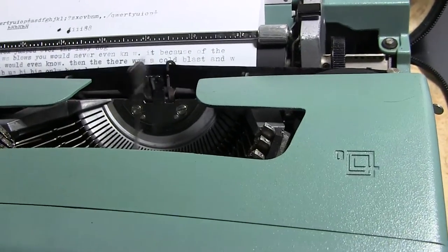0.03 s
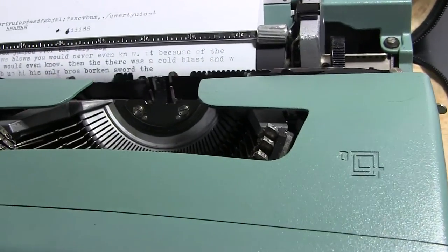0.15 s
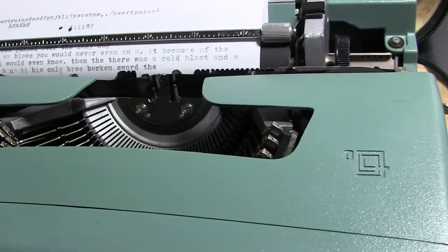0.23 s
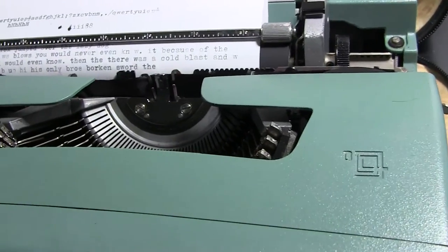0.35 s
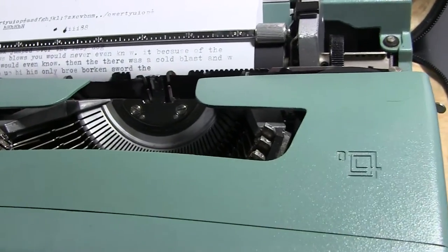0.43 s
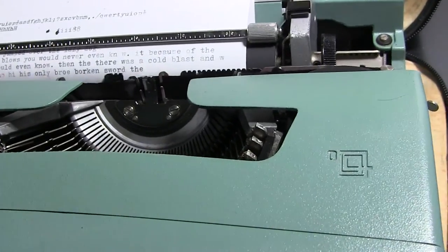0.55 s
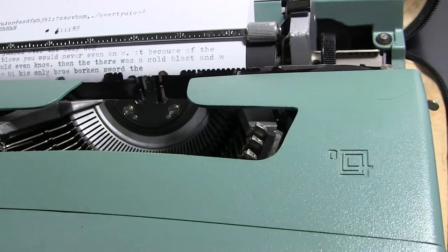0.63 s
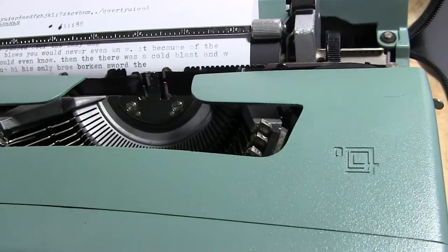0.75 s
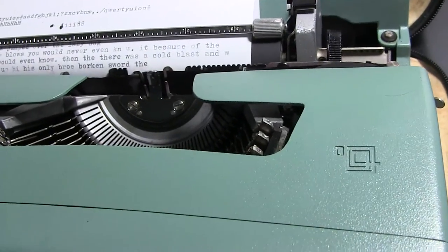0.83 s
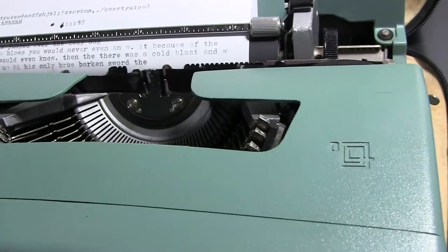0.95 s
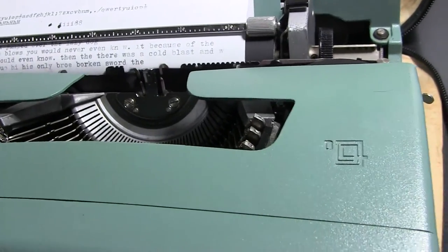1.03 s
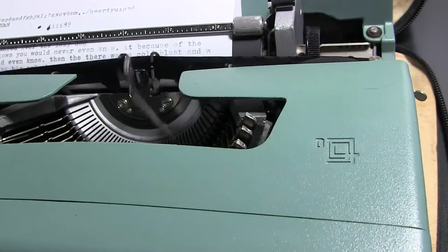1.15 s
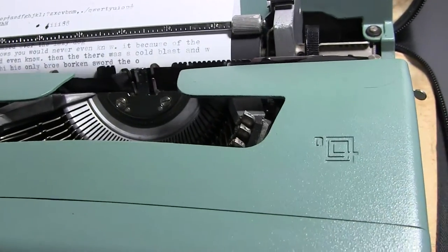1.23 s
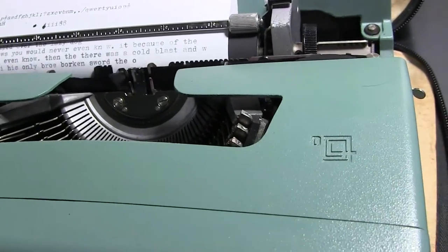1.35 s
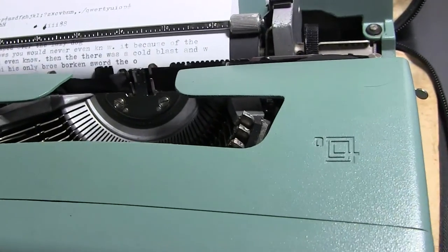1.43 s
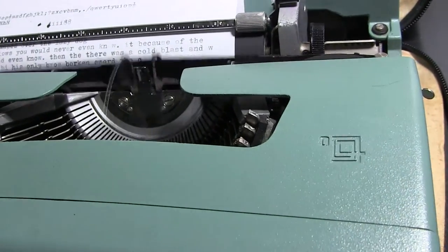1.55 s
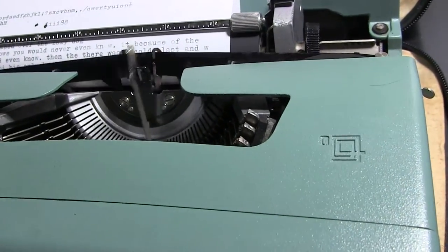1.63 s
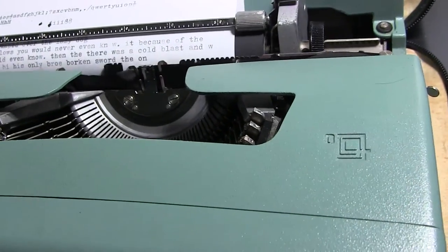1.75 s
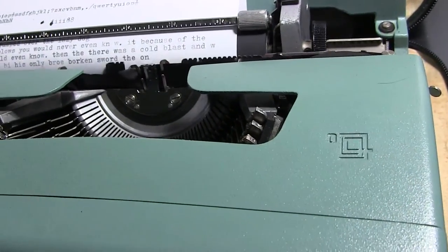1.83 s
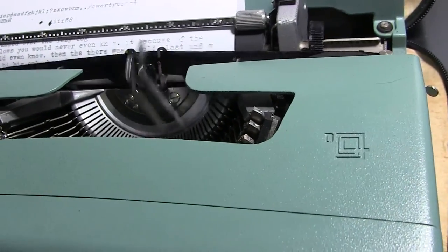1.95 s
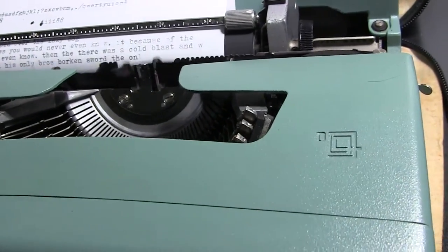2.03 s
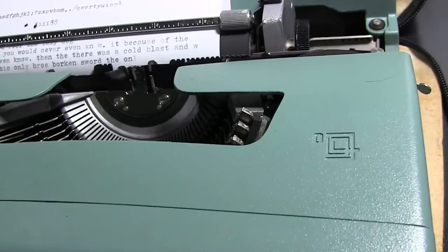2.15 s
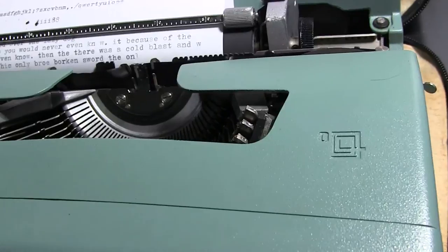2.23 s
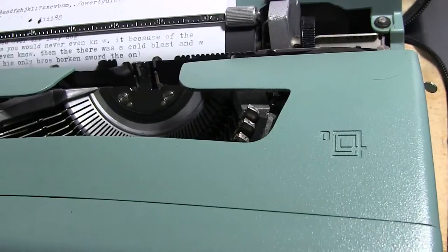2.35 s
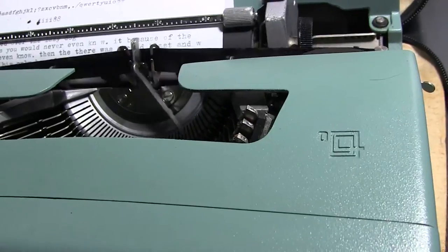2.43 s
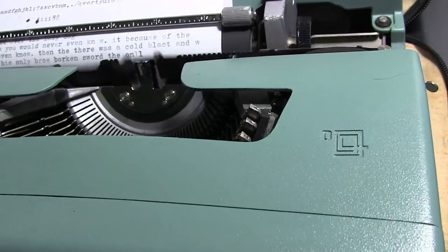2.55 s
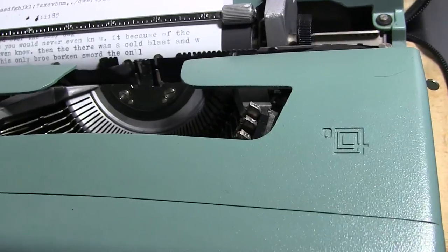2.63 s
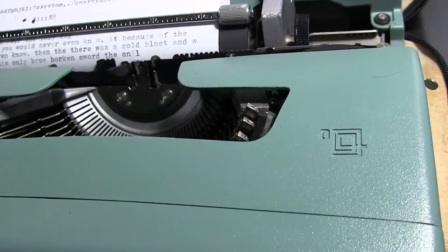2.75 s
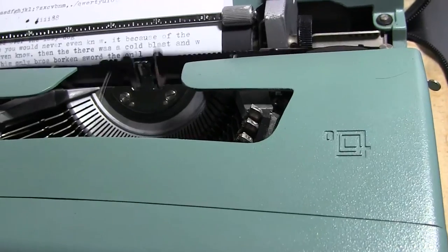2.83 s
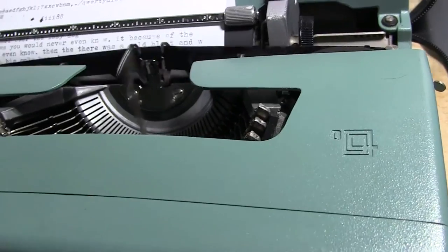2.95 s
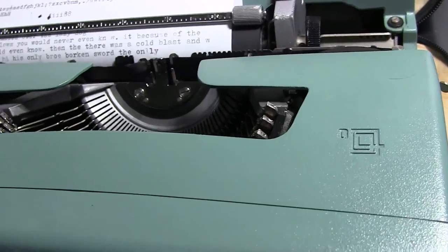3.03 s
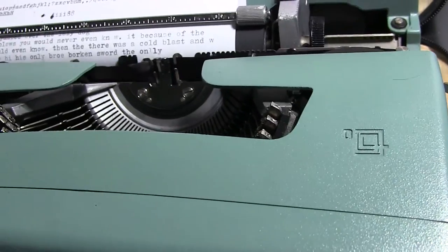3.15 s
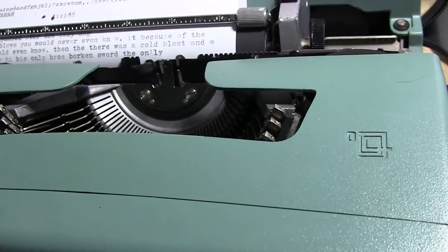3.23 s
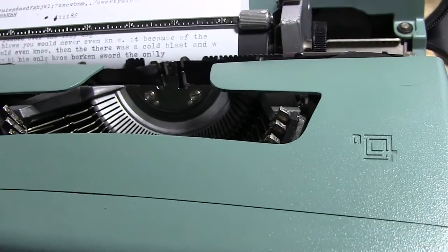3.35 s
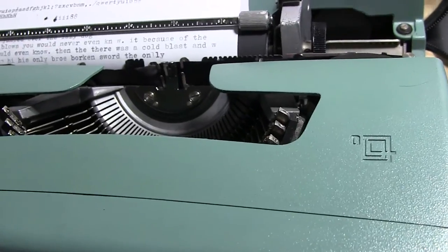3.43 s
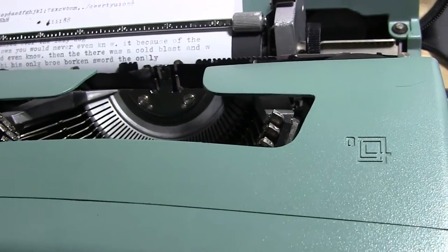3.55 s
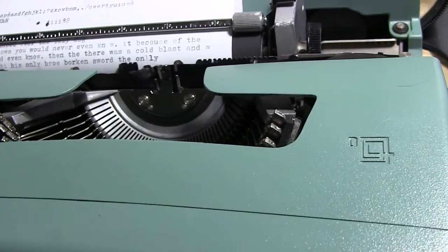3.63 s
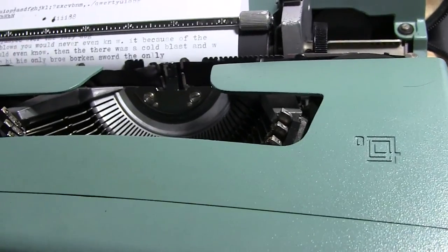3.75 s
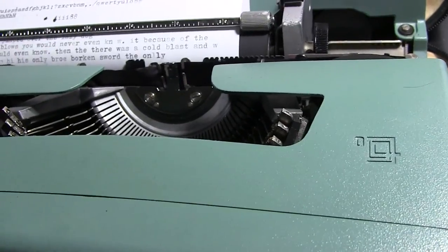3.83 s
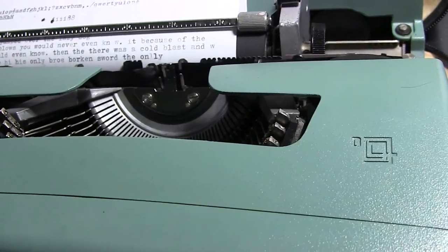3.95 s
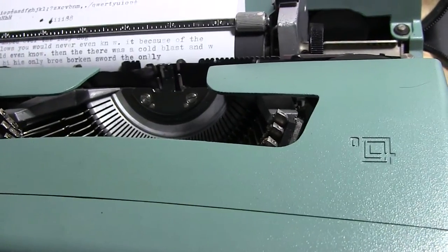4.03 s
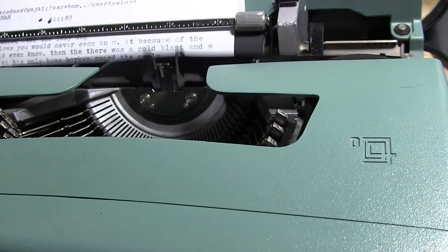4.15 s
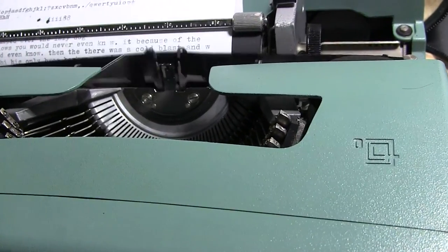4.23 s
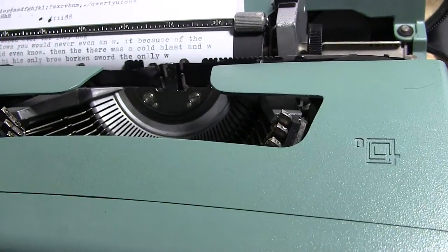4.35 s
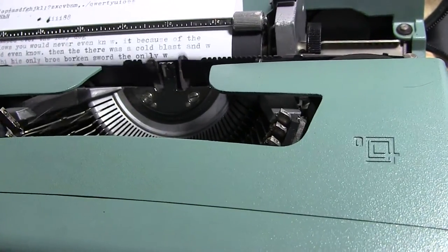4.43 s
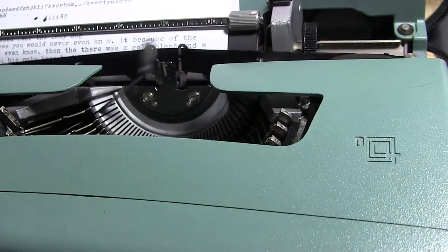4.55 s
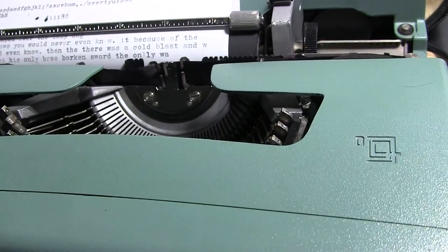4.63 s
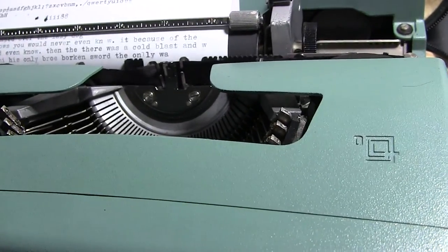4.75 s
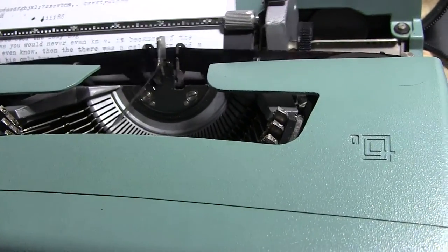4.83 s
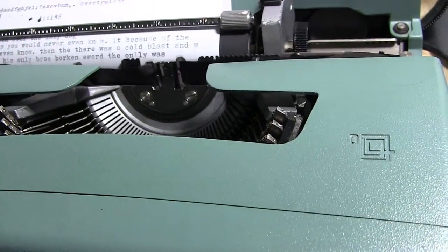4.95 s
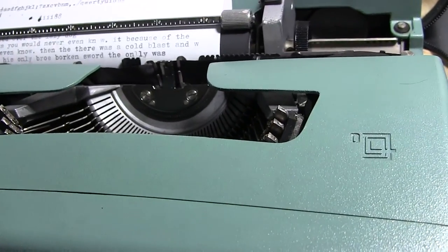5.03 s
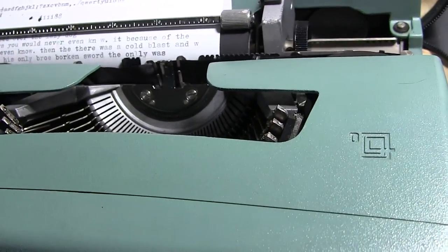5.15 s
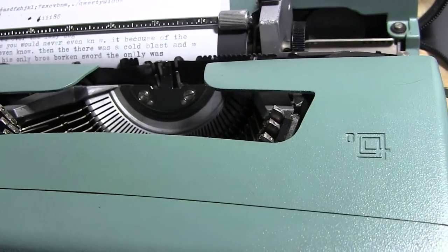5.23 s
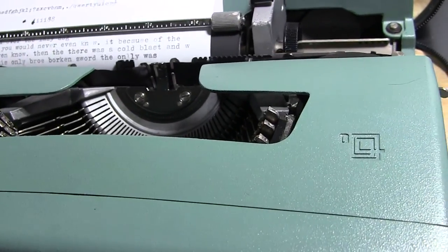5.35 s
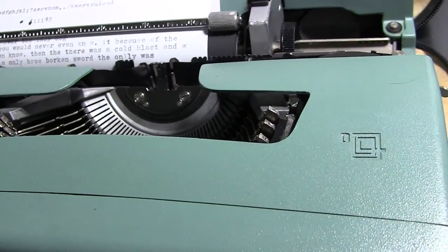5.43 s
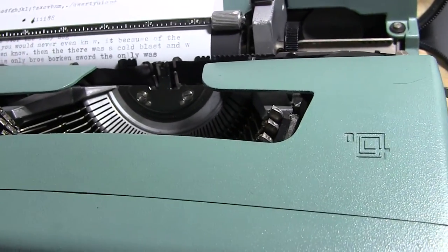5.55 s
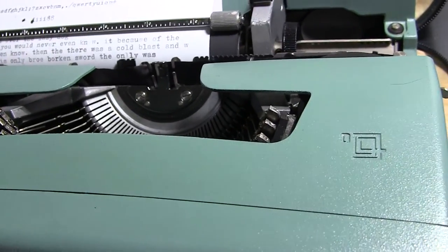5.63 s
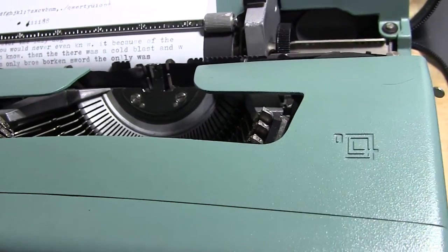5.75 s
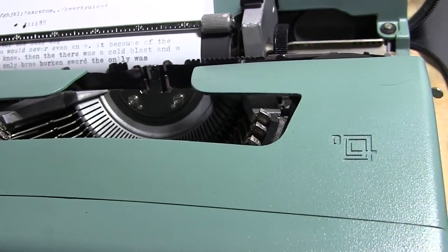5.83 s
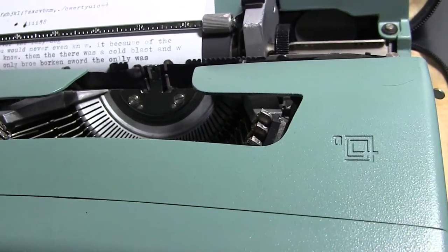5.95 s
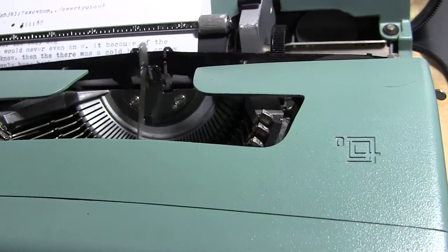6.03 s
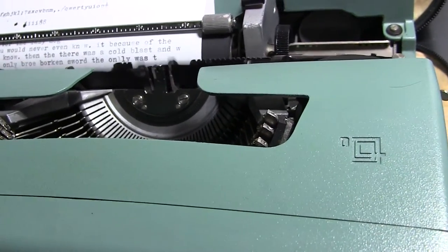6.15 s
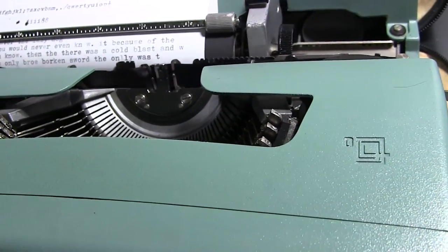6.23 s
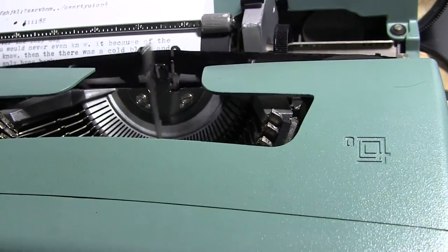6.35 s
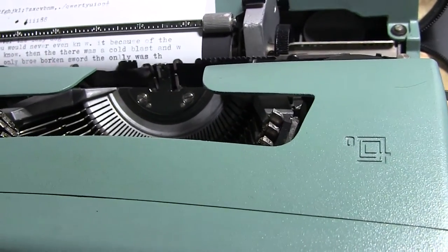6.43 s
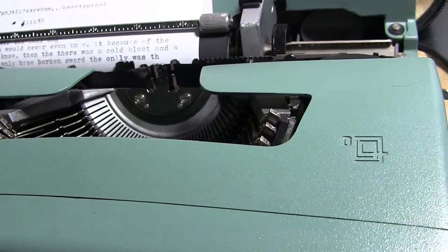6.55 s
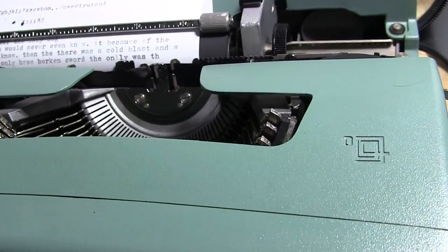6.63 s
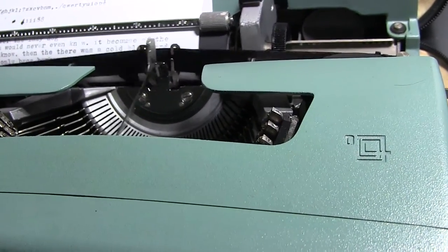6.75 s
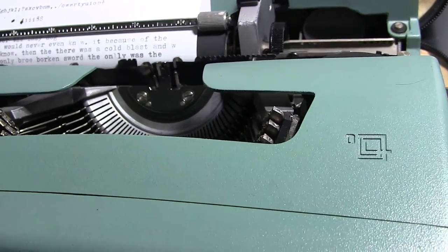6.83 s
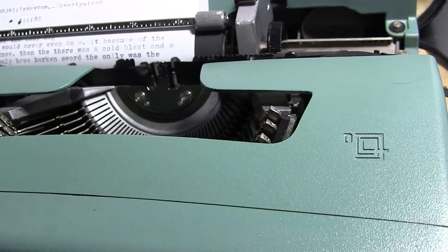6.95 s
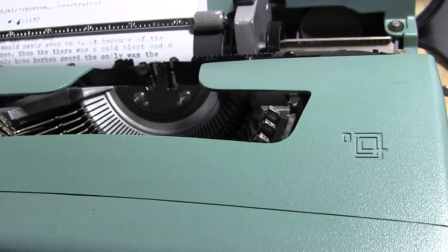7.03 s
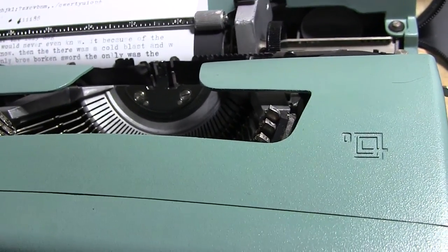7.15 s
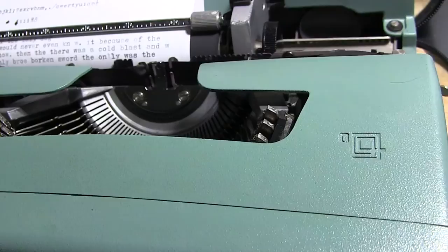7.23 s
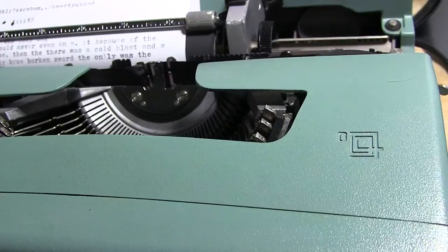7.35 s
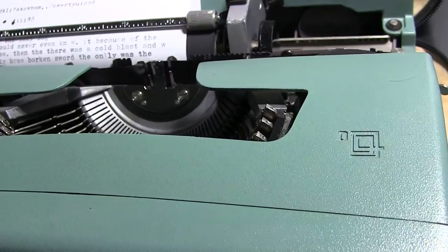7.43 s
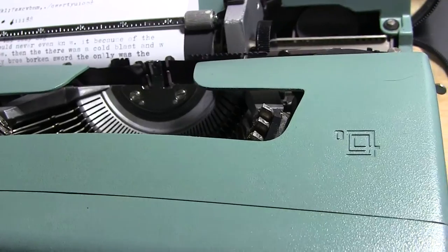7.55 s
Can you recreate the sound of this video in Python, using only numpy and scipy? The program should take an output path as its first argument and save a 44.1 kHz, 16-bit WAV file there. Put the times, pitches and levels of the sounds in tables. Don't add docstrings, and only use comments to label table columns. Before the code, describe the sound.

Close stereo pickup of a manual typewriter on a desk in a quiet room. A space bar slap comes first, then single letters crack sharply about half a second apart, each followed by carriage click and clack of the bar falling back. Heavier space bar thunks separate three short words, with pauses between, and the metal cover rings faintly.

```python
import sys
import numpy as np
from scipy import signal
from scipy.fft import rfft, irfft, next_fast_len
from scipy.io import wavfile
from scipy.ndimage import uniform_filter1d

SR = 44100
rng = np.random.default_rng(int(sys.argv[2]) if len(sys.argv) > 2 else 0)


def materialize(psi):
    bounded = np.clip(np.atleast_2d(psi).T, -1, 1)
    quanta = np.round(bounded * 32767).astype(np.int16)
    wavfile.write(sys.argv[1], SR, quanta)


def how_loud(loudness_db):
    steps = np.asarray(loudness_db, float) / 20
    return 10 ** steps


N = 335160


def unit(x):
    return x / np.sqrt(np.mean(x ** 2) + 1e-20)


def along(points, hz):
    f, v = np.transpose(points)
    return np.interp(np.log(hz + 1), np.log(f + 1), v)


def filtered(x, response):
    m = next_fast_len(x.shape[-1] + SR // 4)
    spectrum = rfft(x, m) * response(np.fft.rfftfreq(m, 1 / SR))
    return irfft(spectrum, m)[..., :x.shape[-1]]


def resonances(modes):
    def response(f):
        total = 0
        for k, (centre, width, db) in enumerate(modes):
            damping = 1j * f * width
            total = total + (-1) ** k * how_loud(db) * damping / (centre ** 2 - f ** 2 + damping)
        return total
    return response


def add(track, s, sound):
    part = track[max(round(s * SR), 0):][:len(sound)]
    part += sound[:len(part)]


def fall(t60, rise_s, count):
    t = np.arange(count) / SR
    return how_loud(-60 * t / t60) * (1 - np.exp(-t / rise_s))


def click(spectrum, hz, t60, lift_db, width, rise_s, dull_db=0):
    def colour(f):
        hump_db = lift_db * np.exp(-(np.log((f + 1) / hz) / width) ** 2)
        return how_loud(along(spectrum, f) + hump_db - dull_db * f / (f + 3000))

    noise = filtered(rng.standard_normal(3000), colour)
    burst = noise * fall(t60, rise_s, count=3000)
    return burst / np.abs(burst).max()


def ring(modes, scatter_db, count):
    t = np.arange(count) / SR
    draw = rng.standard_normal((len(modes), 2))
    total = np.zeros(count)
    for (hz, db, t60), (strength, phase) in zip(modes, draw):
        decay = how_loud(db + scatter_db * strength - 60 * t / t60)
        total += decay * np.sin(2 * np.pi * hz * t + 2 * phase)
    return total


def knocks(track, s, db, t60, hz):
    pushes = rng.standard_normal(1500) * fall(t60, rise_s=0.0029, count=1500)
    at_modes = np.exp(-2j * np.pi * np.outer(hz, np.arange(1500)) / SR) @ pushes
    add(track, s, how_loud(db) * pushes * 10 / np.sqrt(np.mean(np.abs(at_modes) ** 2)))


# (frequency [Hz], density [dB per Hz])
RATTLE = [(290, -20.5), (500, 6.5), (1870, 2.5), (2610, 4), (8330, -6), (12300, -14.5), (15300, -34),
          (16000, -55.5)]


def linkage(level):
    z = signal.stft(rng.standard_normal(N + 256), nperseg=256)[2]
    tinkles = uniform_filter1d(rng.standard_normal(z.shape), size=4, axis=1)
    noise = signal.istft(z * how_loud(3.6 * unit(tinkles)), nperseg=256)[1][:N]
    grain = how_loud(1.5 * unit(uniform_filter1d(rng.standard_normal(N), size=90)))
    coloured = filtered(noise, lambda f: how_loud(along(RATTLE, f)) / (1 + (f / 14300) ** 30))
    return level * unit(grain * coloured)


# (time [s], peak [dB], colour [Hz], rattle [dB], run-up [s])
STRIKES = [(1.2255, -3.5, 3180, -25.5, .0095), (1.731, -1.5, 3100, -28, .011),
           (2.0634, -9.5, 2710, -26, .009), (2.5647, -3.5, 3000, -23.5, .007),
           (3.0021, -4, 2580, -26, .009), (4.2942, -2.5, 6100, -25.5, .014),
           (4.6097, -3.5, 2650, -26, .008), (4.9557, -2.5, 2560, -21, .009), (6.1321, -3, 4050, -22, .007),
           (6.4303, -2, 2580, -25.5, .009), (6.858, -3.5, 4120, -22, .0045)]
# (frequency [Hz], density [dB per Hz])
CRACK = [(350, -52.5), (600, -15), (1750, -12), (2610, -0.5), (4840, -2), (6640, -6), (11500, -12),
         (16000, -32)]
# (frequency [Hz], level [dB], t60 [s])
BAR = [(4400, -4, .25), (7300, -8.5, .08), (7650, -1.5, .08), (10590, -7, .2), (11945, 3.5, 0.12)]
BAR_RING = [-48, -48, -48, -40, -44, -19, -20, -25, -38, -42, -44]
RUN_DB = -25.5


def typebars():
    out, chatter = np.zeros(N), np.zeros(N)
    for (s, db, hz, rattle_db, run_s), ring_db in zip(STRIKES, BAR_RING):
        crack = click(CRACK, hz, t60=0.027, lift_db=8, width=0.067, rise_s=0.00085)
        add(out, s, how_loud(db + 1) * crack)
        snap = click(CRACK, 10000, t60=.009, lift_db=2, width=0.7, rise_s=0.000069)
        add(out, s, how_loud(db + 7.5) * snap)
        add(out, s, how_loud(db + ring_db) * ring(BAR, scatter_db=0, count=8000))
        # (Hz, t60 s)
        drawn = rng.uniform([3000, .1], [11000, .3], size=(16, 2))
        rods = [(rod_hz, along(RATTLE, rod_hz), t60) for rod_hz, t60 in drawn]
        add(out, s, how_loud(db + rattle_db - 11.5) * ring(rods, scatter_db=4, count=9000))
        add(chatter, s, how_loud(db + rattle_db) * fall(0.48, rise_s=.004, count=16000))
        add(chatter, s - run_s, how_loud(RUN_DB + np.linspace(-6, 3, round(run_s * SR))))
    return out + linkage(chatter)


# (time [s], click [dB], colour [Hz], weight [dB])
PRESSES = [(.0667, -20.5, 1160, -31), (.0912, -22.5, 1040, -34), (1.1568, -34.5, 1510, -41),
           (1.1897, -34.5, 1070, -40), (1.6806, -23.5, 1380, -28), (1.9869, -23, 1700, -29),
           (2.0363, -27, 2700, -27), (2.5282, -11.5, 1580, -24), (2.9567, -17, 1130, -21.5),
           (4.2504, -36.5, 1070, -34), (4.564, -23, 1330, -29), (4.5744, -25, 1044, -30),
           (4.9162, -19.5, 3500, -25), (6.0741, -36, 1070, -34.5), (6.3864, -15, 1325, -22.5),
           (6.8099, -19.5, 3350, -26)]
# (time [s], click [dB], colour [Hz], weight [dB])
TRIPS = [(1.2635, -18, 3930, -35), (1.7674, -16, 3730, -28), (2.0916, -13, 5560, -29),
         (2.6194, -19, 3180, -28), (4.3344, -17, 1120, -27), (4.371, -10.5, 3820, -29),
         (4.3804, -15.5, 1380, -34), (4.6394, -13, 3700, -23), (4.6994, -22, 1030, -33),
         (4.9994, -16.5, 4400, -30)]
# (time [s], click [dB], weight [dB], rattle [dB])
STEPS = [(.1401, -8, -22, -23.5), (1.2745, -10.5, -21.5, -21.5), (1.7844, -14, -22, -25.5),
         (2.1121, -8, -19, -25), (2.6524, -11, -21, -22), (3.0515, -16.5, -21, -19),
         (3.3588, -16, -22, -25), (4.3869, -14.5, -22, -28.5), (4.6624, -11.5, -20, -26),
         (5.0549, -10.5, -22, -27), (5.4316, -11.5, -24, -26), (6.1823, -12.5, -22, -19.5),
         (6.4817, -12.5, -21, -21), (6.9102, -12.5, -23, -24.5), (7.3407, -14.5, -23.5, -25)]
STEP_HZ = 1090
# (time [s], click [dB], colour [Hz], weight [dB], ring left in cover [dB])
RESTS = [(.2324, -3, 1070, -19, 2), (1.3653, -5.5, 2216, -23.5, 0), (1.8567, -2, 1030, -20, 2),
         (2.1809, -3.5, 2460, -22, -2), (2.6893, -4.5, 990, -24, 4), (3.1298, -3, 2240, -23, 1),
         (4.4114, -5, 1430, -21.5, 3), (4.7451, -5, 1580, -20.5, -5), (5.0809, -8, 1840, -21, 1),
         (6.2871, -2, 1650, -21, 0), (6.5495, -3, 2200, -20, -1), (6.9805, -3.5, 1570, -21, 0)]
# (time [s], click [dB], colour [Hz], weight [dB], hum [dB])
SPACES = [
    (.1156, -5, 1360, -13, -20),
    (3.3293, 0, 1330, -14, -13.5),
    (5.4026, 0.5, 1876, -15.5, -14),
    (7.3103, -.5, 1370, -16, -14),
]
# (time [s], click [dB], colour [Hz], weight [dB])
SPRINGS = [
    (.2144, -18, 4500, -30),
    (3.4544, -18.5, 1330, -31),
    (3.4695, -9, 4740, -27),
    (5.5263, -13, 5170, -24),
    (7.4354, -29, 5130, -40),
    (7.448, -18.5, 4830, -35),
]
# (time [s], click [dB], colour [Hz], weight [dB])
LANDS = [
    (3.4844, -11.5, 1110, -23),
    (5.5494, -12, 1170, -20),
    (7.4649, -13, 1110, -21.5),
]
# (click t60 [s], rattle [dB], knock [dB], thud [dB], thud lag [s],
# desk [dB], push t60 [s], resonance [dB])
PRESS = (.03, -7.5, -4, 0, .001, -14, .027, 5)
TRIP = (.033, -1, 4, -4, 0, -11, .03, 7)
STEP = (.027, 0, 8, 0, .003, -9, .028, 4.5)
REST = (.023, -9, 3, 0, -.004, -17, .03, 8)
STOP = (.021, -19, -2, -5, .002, -18, .04, 6)
SPRING = (.045, -2, -8, -2, -.003, -7, .03, 14)
LAND = (.035, -20, 8, 0, -.003, -8, .035, 4.5)


def metal_contacts():
    contact_list = []
    for s, db, weight_db, rattle_db in STEPS:
        contact_list.append((s, db, STEP_HZ, weight_db, rattle_db - weight_db, STEP))
    tables = [(PRESSES, PRESS), (TRIPS, TRIP), (RESTS, REST),
              (SPACES, STOP), (SPRINGS, SPRING), (LANDS, LAND)]
    for rows, part in tables:
        contact_list += [(*row[:4], 0, part) for row in rows]
    return contact_list


# (time [s], peak [dB], colour [Hz])
TICKS = [(.222, -24, 1480), (1.209, -26.5, 2000), (1.353, -26, 2500), (1.714, -29, 2500),
         (2.092, -11, 10920), (3.5044, -22, 4700), (4.6, -27.5, 2930), (4.735, -36.5, 4010),
         (5.517, -22.5, 5000), (5.533, -16, 4870), (6.118, -21.5, 6000), (6.142, -18.5, 8000),
         (7.373, -32.5, 4470), (7.4894, -38.5, 1180)]
TICK_T60_S = .042
# (lag [s], level under the stop [dB], colour [Hz])
SPACE_LEADS = [
    (-.018, -28, 4500),
    (-.008, -19, 3800),
]
# (time [s], peak [dB])
BOUNCES = [(1.423, -27), (1.8986, -27), (2.245, -27.5), (2.741, -23.5), (3.1647, -28), (3.703, -44),
           (6.586, -21), (6.614, -29.5)]
BOUNCE_HZ, BOUNCE_T60_S = 1300, .025


def small_ticks():
    ticks = [(*row, TICK_T60_S) for row in TICKS]
    for s, db, *_ in SPACES:
        for lag, under_db, hz in SPACE_LEADS:
            ticks.append((s + lag, db + under_db, hz, TICK_T60_S))
    return ticks + [(s, db, BOUNCE_HZ, BOUNCE_T60_S) for s, db in BOUNCES]


# (frequency [Hz], density [dB per Hz])
CLACK = [(350, -35), (600, -8), (1230, 1), (5190, -7), (6030, -6.5), (12500, -20), (16000, -36)]
# (frequency [Hz], width [Hz], level [dB])
PANELS = [(638, 60, -1.5), (788, 83, 2), (1030, 56, 3), (1086, 83, 2), (1330, 33, 2.5)]
# (frequency [Hz], width [Hz], level [dB])
COVER = [(721, 4, -2.5), (766, 9, -4), (917, 5, -4.5), (1030, 6, -2.5), (1162, 5.5, -4), (2090, 9, -16)]
APPROACH_S, APPROACH_DB = .007, -21


def contacts():
    out, chatter, blows = np.zeros(N), np.zeros(N), np.zeros(N)
    approach_db = APPROACH_DB + np.linspace(-15, 0, round(APPROACH_S * SR))
    for s, db, hz, weight_db, extra_db, part in metal_contacts():
        t60, rattle_db, knock_db, *_, resonance_db = part
        chatter_db = weight_db + extra_db + rattle_db
        blow_db = weight_db + knock_db
        dull_db = 0.6 * max(blow_db - db + 11.5, 0)
        clack = click(CLACK, hz, t60, lift_db=resonance_db, width=0.2, rise_s=.003, dull_db=dull_db)
        add(out, s - .0015, how_loud(db - 1.5) * clack)
        add(chatter, s, how_loud(chatter_db) * fall(0.14, rise_s=0.0054, count=10000))
        add(chatter, s - APPROACH_S, how_loud(db + approach_db))
        knocks(blows, s, blow_db + 12.5, t60=0.033, hz=[c for c, *_ in PANELS])
    for s, db, hz, t60 in small_ticks():
        add(out, s, how_loud(db) * click(CLACK, hz, t60, lift_db=19, width=0.24, rise_s=.0015))
    panels = filtered(blows, resonances(PANELS))
    sheet = how_loud(7) * filtered(blows, resonances(COVER))
    return out + linkage(chatter) + panels + sheet


# (lag [s], peak [dB], desk [dB], push t60 [s])
STRIKE_THUD = (-.003, -28, -15, .033)
REBOUND_S, REBOUND_DB, REBOUND_DESK_DB, REBOUND_T60_S = .03, -7, -12, .025


def frame_blows():
    blows = [(s + STRIKE_THUD[0], *STRIKE_THUD[1:]) for s, *_ in STRIKES]
    for s, _, _, weight_db, _, part in metal_contacts():
        thud_db, lag, desk_db, t60 = part[3:7]
        blows.append((s + lag, weight_db + thud_db, desk_db, t60))
        if part in (STEP, LAND):
            rebound_db = weight_db + REBOUND_DB
            blows.append((s + lag + REBOUND_S, rebound_db, REBOUND_DESK_DB, REBOUND_T60_S))
    return blows


# (frequency [Hz], width [Hz], level [dB])
FRAME = [(224, 15.9, 1.5), (342, 46, -6.5), (434.6, 17, -5)]
# (frequency [Hz], width [Hz], level [dB])
DESK = [(87.6, 15, -1), (121.4, 20, 2)]


def thuds():
    frame, desk = np.zeros(N), np.zeros(N)
    for s, db, desk_db, t60 in frame_blows():
        knocks(frame, s, db + 29, t60, hz=[c for c, *_ in FRAME[:2]])
        knocks(desk, s, db + desk_db + 36, t60, hz=[c for c, *_ in DESK])
    body = filtered(frame, resonances(FRAME)) + filtered(desk, resonances(DESK))
    return filtered(body, lambda f: 1 / (1 + 1j * f / 500) ** 2)


# (low [dB], middle [dB], high [dB])
AFTER_REST = (-52, -50.5, -45)
AFTER_STEP = (-43, -49, -40)
AFTER_LAND = (-50, -46, -43)
REST_LEAN = [-4, 8, 2, 5, 0, 1, -7, -4, -6, -4, 6, -3]
LEAN_SHARE = (1, -.8, 0)
# (time [s], low [dB], middle [dB], high [dB])
EARLIER_RING = (0, -67, -59, -56)


def after_rings():
    rows = [EARLIER_RING]
    for (s, *_, ring_db), lean in zip(RESTS, REST_LEAN):
        levels = np.add(AFTER_REST, ring_db) + np.multiply(LEAN_SHARE, lean)
        rows.append((s, *levels))
    rows += [(s, *AFTER_STEP) for s, *_ in STEPS]
    rows += [(s, *AFTER_LAND) for s, *_ in LANDS]
    return sorted(rows)


# (frequency [Hz], t60 [s])
CHIMES = [(323, 1.2), (1287, 1.1), (2456, .6)]


def cover():
    out, rings = np.zeros(N), after_rings()
    for (s, *levels), (stop, *_) in zip(rings, rings[1:] + [(N / SR,)]):
        modes = [(hz, db, t60) for (hz, t60), db in zip(CHIMES, levels)]
        count = round((stop - s) * SR)
        swell = signal.windows.tukey(count, 800 / count)
        add(out, s, ring(modes, scatter_db=0, count=count) * swell)
    return out


def space_bar():
    out = np.zeros(N)
    for s, *_, db in SPACES:
        hum = ring([(220.9, db, 0.29)], scatter_db=0.5, count=9000)
        add(out, s + .002, hum * fall(0.49, rise_s=.004, count=9000))
    return out


# (frequency [Hz], t60 [s])
ROOM = [(150, 0.9), (1000, 0.46), (4000, .45), (12000, 0.28), (15000, .08)]


def room(x):
    out, step, delay = np.zeros((2, N + SR)), SR // 3, 300
    for start in range(0, N, step):
        hz, t, z = signal.stft(rng.standard_normal((2, step)), SR, nperseg=256)
        decay = how_loud(-60 * t / along(ROOM, hz)[:, None])
        tail = signal.istft(z * decay, SR, nperseg=256)[1]
        tail = tail / np.linalg.norm(tail[0])
        wet = signal.fftconvolve(x[None, start:start + step], tail, axes=1)
        out[:, start + delay:start + delay + wet.shape[1]] += wet
    return out[:, :N]


# (frequency [Hz], density [dB per Hz])
HUSH = [(20, -25), (80, -3), (150, -8), (230, -4), (490, -14), (900, -11), (2500, -17), (16000, -38.5)]
# (time [s], level [dB])
HUSH_LEVEL = [(0, -54.5), (.45, -56), (1.2, -56.5), (3.8, -56.5), (4.2, -59), (5.9, -57.5), (7.6, -56)]


def hush():
    level_db = np.interp(np.arange(N) / SR, *np.transpose(HUSH_LEVEL))
    mid, side = filtered(rng.standard_normal((2, N)), lambda f: how_loud(along(HUSH, f)))
    return how_loud(level_db) * unit(np.array([mid + .06 * side, mid - .06 * side]))


# (frequency [Hz], side against mid [dB])
SPREAD = [(60, -25), (150, -25.5), (380, -13.5), (700, -15), (1290, -13.5), (4400, -10), (8120, -7.5),
          (15000, -5.5)]


def scene():
    machine = typebars() + contacts() + thuds() + cover() + space_bar()
    wet, wet_side = room(machine)
    z = signal.stft(np.pad(machine, (0, 128)), nperseg=128)[2]
    phases = np.exp(2j * np.pi * rng.random(z.shape))
    scattered = signal.istft(z * phases, nperseg=128)[1][:N]
    side = filtered(scattered + how_loud(-12) * wet_side, lambda f: how_loud(along(SPREAD, f) - 5))
    lean = filtered(machine, lambda f: .06 * f * f / (f * f + 700 ** 2))
    return machine + how_loud(-18.5) * wet + np.array([side + lean, -side - lean]) + hush()


def band_limit(x):
    return signal.sosfilt(signal.butter(12, 16320, fs=SR, output="sos"), x)


TOP_HZ = 15200


def record(dry):
    flattened = dry / (1 + np.abs(dry / .93) ** 12) ** (1 / 12)
    heard = filtered(flattened, lambda f: 1 / (1 + (f / TOP_HZ) ** 24))
    return band_limit(heard)


dry = scene()
out = record(dry)
materialize(out)
```